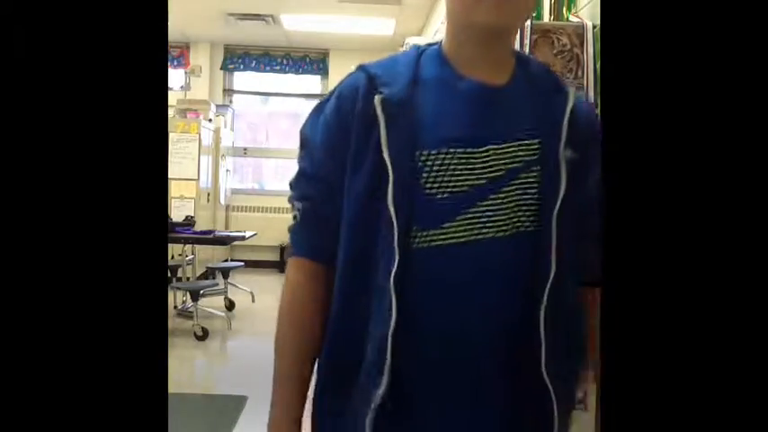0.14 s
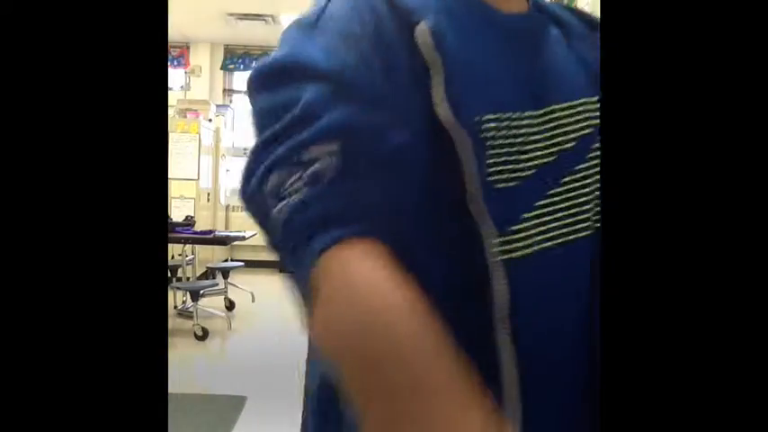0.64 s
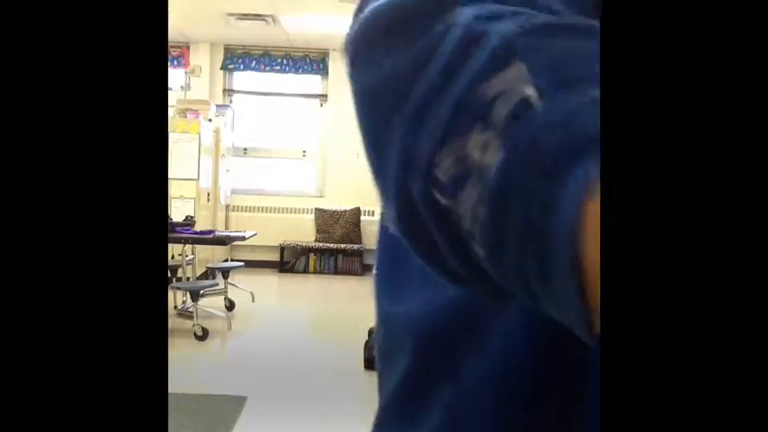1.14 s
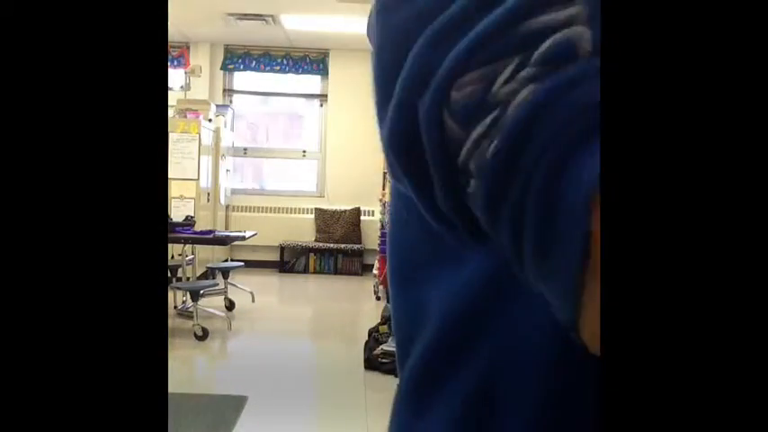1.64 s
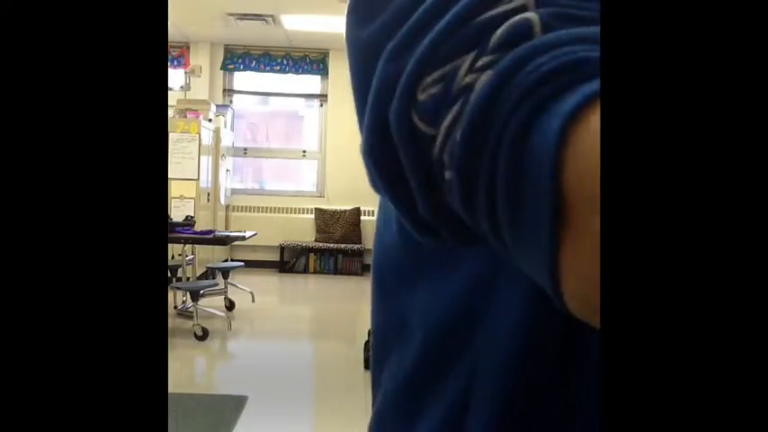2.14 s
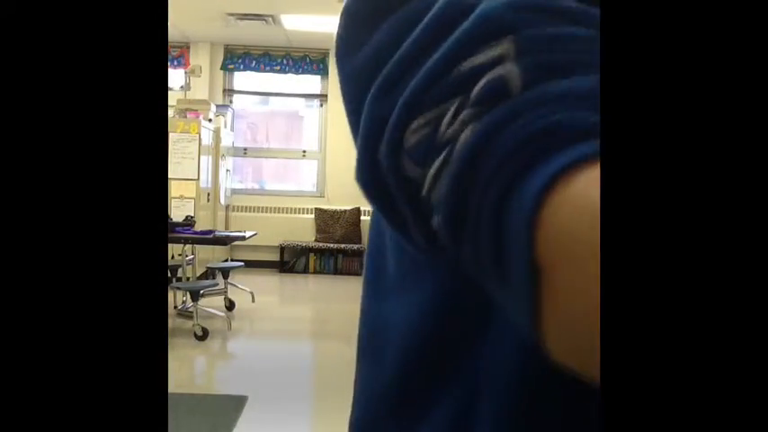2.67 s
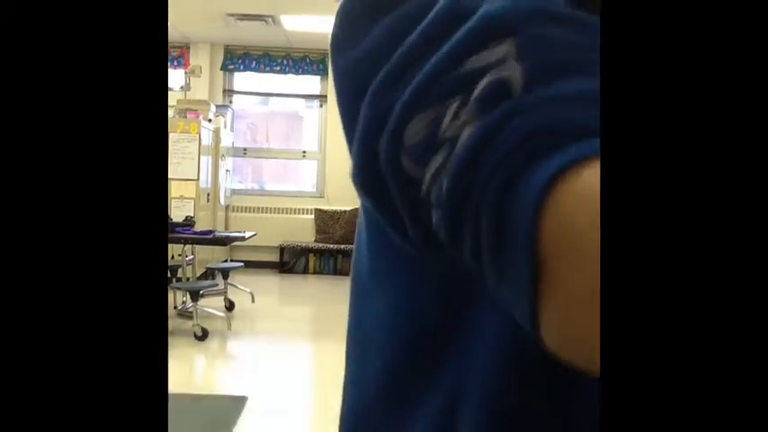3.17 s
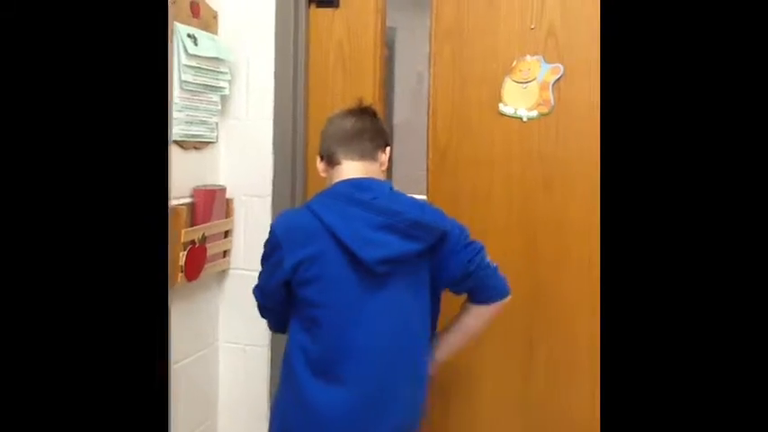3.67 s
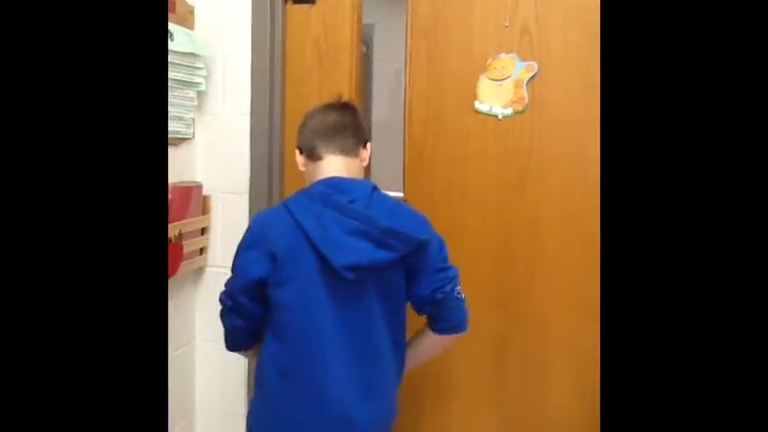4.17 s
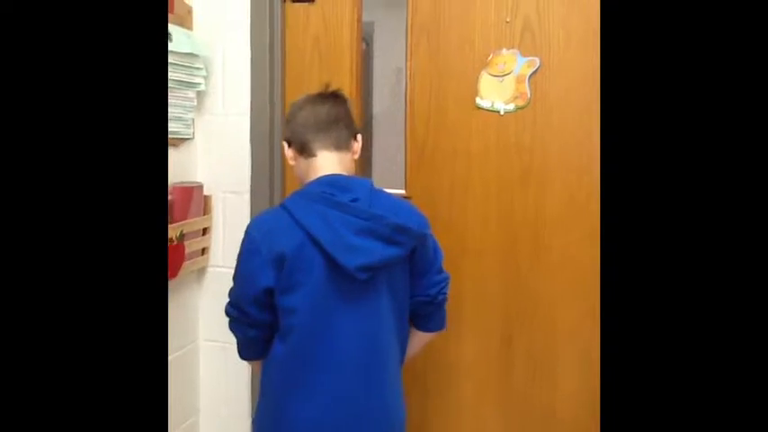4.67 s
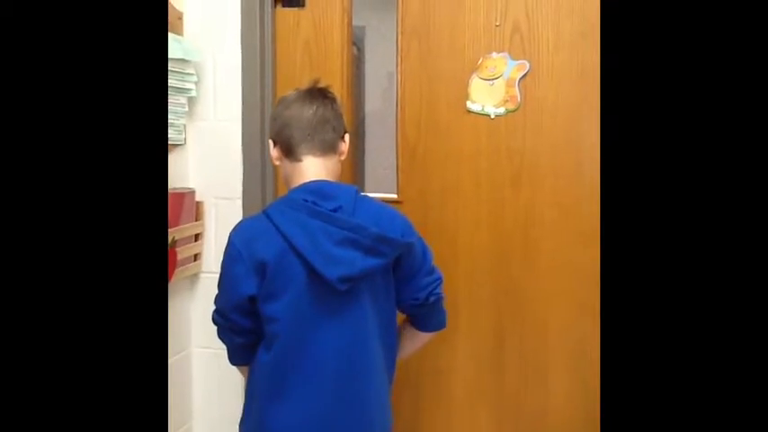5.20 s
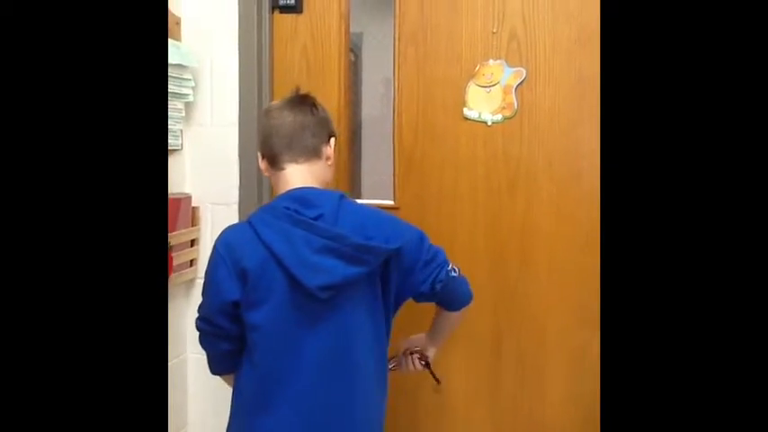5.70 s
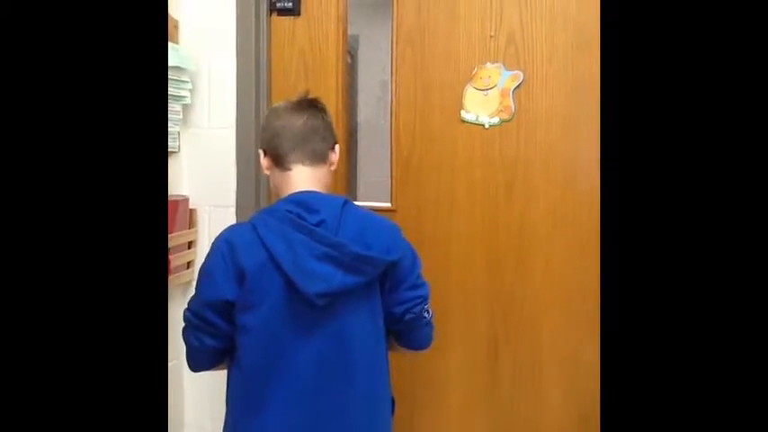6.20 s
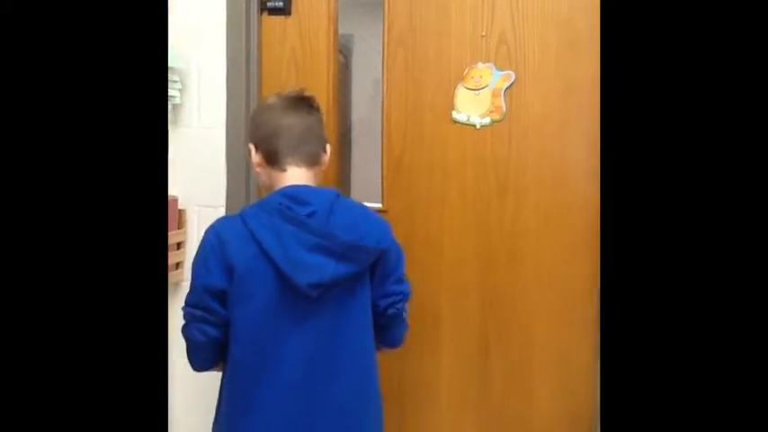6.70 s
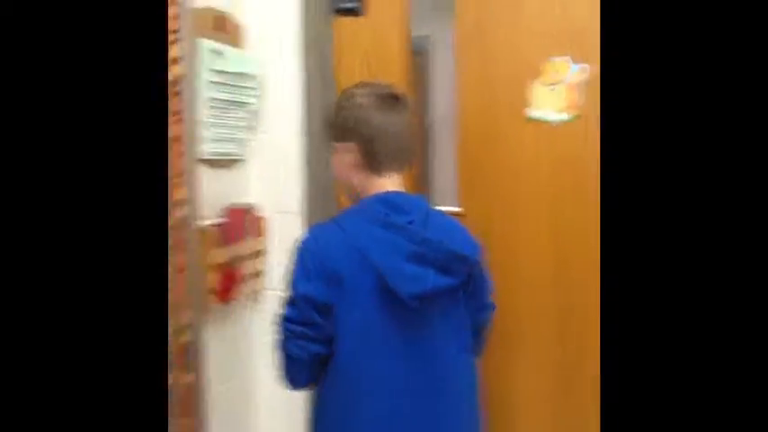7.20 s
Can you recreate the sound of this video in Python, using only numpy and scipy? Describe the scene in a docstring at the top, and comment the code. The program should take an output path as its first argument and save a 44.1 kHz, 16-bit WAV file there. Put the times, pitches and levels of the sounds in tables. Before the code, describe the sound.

Two indoor takes joined by a hard cut. First, irregular woody knocks and handle clatter, very near, growing busy and then sparser, with a soft air rumble behind. Then a fainter, roomier place: tiny high key clinks, fabric and strap rustles, light taps on a door. A tight burst of blows bangs the wooden door, with short room reverberation, then brief latch rattles, shoe shuffles and small jingles.

```python
"""Two places in a school, one after the other. First, close to the microphone, a loose door handle is rattled:
knocks shake the modes of a wooden door and crack in the metal, over ventilation rumble and dull rubbing.
After a cut, farther off, keys touch in bright scratches and ringing modes while cloth and straps rub as gritty
noise. A faint rub rises into a cluster of blows on the door and the room rings on as decaying noise. A loose
latch buzzes, then taps, soft thuds of feet, small rustles and a few more keys follow."""
import sys
import numpy as np
from scipy import signal
from scipy.fft import rfft, irfft
from scipy.io import wavfile

SR = 44100
rng = np.random.default_rng(int(sys.argv[2]) if len(sys.argv) > 2 else 0)


def unload_wav(signal):
    """Save mono or channel-first audio to the path in sys.argv[1] as 16-bit WAV at rate SR, clipped to [-1, 1]."""
    wavfile.write(
        sys.argv[1],
        SR,
        np.round(np.clip(np.atleast_2d(signal).T, -1, 1) * 32767).astype(np.int16),
    )


def invert_db(level):
    """Linear amplitude ratio for a level in decibels (20 dB per decade), elementwise."""
    return 10 ** (np.asarray(level, dtype=float) / 20)


N = 323852


def rms_one(x):
    """Scale to rms 1."""
    return x / np.sqrt(np.mean(x ** 2) + 1e-20)


def at_hz(points, hz):
    """Read a table on a log-frequency axis."""
    hz_points, values = np.transpose(points)
    return np.interp(np.log(hz), np.log(hz_points), values)


def colour(x, spectrum):
    """Causal filter with the shape of the spectrum (minimum phase); white noise keeps its rms."""
    size = 4096
    bin_hz = np.maximum(np.arange(size // 2 + 1) * SR / size, 1)
    gain = invert_db(at_hz(spectrum, bin_hz))
    cepstrum = irfft(np.log(rms_one(gain)))
    # folding the cepstrum forward in time gives minimum phase
    cepstrum[1:size // 2] *= 2
    cepstrum[size // 2 + 1:] = 0
    response = irfft(np.exp(rfft(cepstrum)))
    return signal.fftconvolve(x, response)[:len(x)]


def grit(lumpy_db):
    """Dense tiny contacts: noise whose sizes have a long tail; rms 1."""
    sizes_db = lumpy_db * np.minimum(rng.exponential(1, N), 6)
    return rms_one(rng.standard_normal(N) * invert_db(sizes_db))


def bursts(times, levels_db, lengths_ms, die_ms, rise_ms=.01):
    """Envelope of rattles: quick start, held for its length, then dying; the loudest one counts."""
    out = np.zeros(N)
    t_ms = np.arange(1, int(.15 * SR)) / SR * 1000
    for s, level_db, length_ms, tail_ms in zip(*np.broadcast_arrays(times, levels_db, lengths_ms, die_ms)):
        dying = np.exp(-np.maximum(t_ms - max(length_ms, 0), 0) / max(tail_ms, .2))
        shape = dying * (1 - np.exp(-t_ms / max(rise_ms, .01)))
        i = round(s * SR)
        out[i:i + len(t_ms)] = np.maximum(out[i:i + len(t_ms)], invert_db(level_db) * shape[:N - i])
    return out


def strokes(full_times, holds, levels_db, rise_db_per_s, fall_db_per_s):
    """Level in dB of movements that rise to full, hold and fall at steady rates; the loudest one counts."""
    t = np.arange(N) / SR
    out = np.full(N, -120.)
    for full_s, hold, level_db in zip(full_times, holds, levels_db):
        rise_db = rise_db_per_s * np.maximum(full_s - t, 0)
        fall_db = fall_db_per_s * np.maximum(t - full_s - hold, 0)
        out = np.maximum(out, level_db - rise_db - fall_db)
    return out


def resonances(x, peaks):
    """Parallel two-pole resonators, signs alternating."""
    out = 0
    for k, (hz, width_hz, level_db) in enumerate(peaks):
        r = np.exp(-np.pi * max(width_hz, 5) / SR)
        a = [1, -2 * r * np.cos(2 * np.pi * hz / SR), r * r]
        b = [(1 - r * r) / 2, 0, (r * r - 1) / 2]
        out = out + (-1) ** k * invert_db(level_db) * signal.lfilter(b, a, x + 1e-18)
    return out


def ring(force, hz, t60):
    """A unit click sets a sine starting at height 1 ringing; it decays by 60 dB in t60 seconds."""
    r = invert_db(-60 / (max(t60, .005) * SR))
    w = 2 * np.pi * hz / SR
    return signal.lfilter([0, np.sin(w)], [1, -2 * r * np.cos(w), r * r], force + 1e-18)


# edges of third-octave bands: edge_hz [Hz]
BAND_EDGES = 25 * 2 ** np.arange(0, 9.6, 1 / 3)
# how long the room rings, at both places: pitch_hz [Hz], t60_s [s]
ROOM_DECAY = [(100, .7), (300, 0.66), (1000, 0.4), (4000, 0.43), (12000, 0.37)]


def room(x, build_ms):
    """Diffuse tail: noise that builds up and dies band by band."""
    t = np.arange(SR) / SR
    tail = 0
    white = rng.standard_normal((2, SR))
    for k, (low, high) in enumerate(zip(BAND_EDGES[::2], BAND_EDGES[2::2])):
        sos = signal.butter(2, [low, high], "band", fs=SR, output="sos")
        band = signal.sosfilt(sos, white[k % 2])
        t60 = max(at_hz(ROOM_DECAY, np.sqrt(low * high)), .05)
        tail = tail + band * invert_db(-60 * t / t60)
    tail = tail * (1 - np.exp(-1000 * t / build_ms))
    return signal.fftconvolve(x, tail / np.sqrt(np.sum(tail ** 2)))[:N]


# air at the near place, ventilation rumble: pitch_hz [Hz], level_db [relative dB per Hz]
NEAR_AIR_COLOUR = [(15, -46), (25, -44), (101, 3.5), (240, 6.5), (421, -19.5), (495, -24), (666, -16.5),
                   (1110, -17.5), (1300, -13.5), (1490, -15.5), (3170, -21), (12200, -25), (15500, -27)]
# air at the far place: pitch_hz [Hz], level_db [relative dB per Hz]
FAR_AIR_COLOUR = [(15, -67), (25, -34.5), (43, -15), (96, -12), (169, -2), (567, -14.5), (1140, -18.5),
                  (1530, -18.5), (2560, -20), (3000, -20.5), (3630, -21), (11800, -23), (15500, -24.5)]


def air(spectrum, rms_db):
    """Steady noise with the spectrum of the place, at the given rms in dB."""
    return invert_db(rms_db) * colour(rng.standard_normal(N), spectrum)


# hand and door moving between knocks, pushes:
# full_s [s, when the movement reaches its full level], hold_s [s], level_db [dB]
PUSHES = [(0.67, 0.023, -56), (1.39, 0.018, -40.5), (1.91, 0.014, -50.5), (2.347, 0.086, -44.5),
          (3.204, 0.017, -59)]
# dull rubbing of hand and door: pitch_hz [Hz], level_db [relative dB per Hz]
PUSH_COLOUR = [(71, -28), (120, -5.5), (289, 4), (536, -1), (740, -6.5), (1070, -6.5), (1180, -21),
               (1760, -21), (4000, -33.5), (5200, -82), (8800, -120)]
# a short low hum: pitch_hz [Hz], width_hz [Hz], level_db [dB]
HUM = (224, 9.2, -49.5)
HUM_START_S, HUM_END_S = 3.18, 3.26


def shuffle():
    """Dull gritty rubbing of hand and door, and one short low hum of narrow noise."""
    pushes_db = strokes(*np.transpose(PUSHES), rise_db_per_s=58, fall_db_per_s=22.5)
    pushes_db = np.maximum(pushes_db, -58.5)   # between pushes the rubbing rests at this level
    rubbing = colour(invert_db(pushes_db) * grit(lumpy_db=4.0), PUSH_COLOUR)
    hz, width_hz, level_db = HUM
    progress = np.clip((np.arange(N) / SR - HUM_START_S) / (HUM_END_S - HUM_START_S), 0, 1)
    swell = np.sin(np.pi * progress) ** .5
    hum = rms_one(resonances(rng.standard_normal(N), [(hz, width_hz, 0)]))
    return rubbing + invert_db(level_db) * swell * hum


# feet shifting: full_s [s, when the movement reaches its full level], hold_s [s], level_db [dB]
STEPS = [(6.736, .025, -54), (6.942, .01, -47.5), (7.218, .06, -75), (7.316, .004, -70)]
# soft thud of a shoe: pitch_hz [Hz], level_db [relative dB per Hz]
STEP_COLOUR = [(35, -61), (60, -34), (172, -2.5), (355, -7), (389, -7), (494, -14.5), (900, -17),
               (1170, -40.5), (1980, -120)]


def feet():
    """Shoes thud softly on the floor: low noise that rises and falls with each step."""
    level_db = strokes(*np.transpose(STEPS), rise_db_per_s=204, fall_db_per_s=184)
    return invert_db(level_db) * colour(rng.standard_normal(N), STEP_COLOUR)


# cloth and strap strokes: full_s [s, when the movement reaches its full level], hold_s [s],
# level_db [dB], pitch_hz [Hz, centre of the rub]
RUBS = [(4.093, .004, -49.5, 11400), (4.224, .004, -53.5, 11300), (4.326, 0.045, -55, 10500),
        (4.43, 0.027, -59, 10000), (4.505, .03, -59.5, 3580), (4.682, .01, -56.5, 10000),
        (4.796, .004, -53, 11600), (4.91, .03, -61.5, 11500), (4.972, 0.0037, -48.5, 10200),
        (5.494, 0.09, -57, 8900), (5.647, .004, -59, 10200), (5.842, 0.023, -56, 6540),
        (5.894, 0.015, -46.5, 5400), (5.924, 0.021, -44, 4380), (5.943, 0.027, -49, 2500),
        (6.141, 0.047, -47.5, 11600), (6.686, 0.0072, -61, 10070), (6.718, 0.015, -47, 3500),
        (6.73, 0.023, -46.5, 9400), (6.763, 0.028, -46.5, 8300), (6.913, 0.035, -52, 3000),
        (7.012, 0.032, -54, 8900), (7.055, 0.026, -59, 10000), (7.15, .04, -64.5, 7300)]
# door panel scraped or touched: pitch_hz [Hz], level_db [relative dB per Hz]
SCRAPE_COLOUR = [(180, -43), (300, -6), (439, -11.5), (615, -4.5), (817, -4.5), (1100, -6), (1300, -1.5),
                 (1820, -4), (2040, -12), (2500, -9.5), (3250, -42.5), (5500, -120)]
# slow, pressed strokes are dull and reach the panel
PRESSED_HZ, PANEL_DB, PANEL_LOSS_DB_PER_OCTAVE = 3000, 2, 13.5


def cloth(octaves=0.66, skirt_db=-14):
    """Gritty rubbing; a broad spectral hump glides between the strokes' pitches, and the panel hums along."""
    full_s, hold, level_db, hz = np.transpose(RUBS)
    rub_db = strokes(full_s, hold, level_db, rise_db_per_s=399.5, fall_db_per_s=299.5)
    pressed_db = level_db + PANEL_DB - PANEL_LOSS_DB_PER_OCTAVE * np.log2(hz / PRESSED_HZ)
    panel_db = strokes(full_s, hold, pressed_db, rise_db_per_s=800, fall_db_per_s=197)
    centre_hz = np.interp(np.arange(N) / SR, np.ravel([full_s, full_s + hold], "F"), np.repeat(hz, 2))
    rub = [grit(lumpy_db=1.5), grit(lumpy_db=1.5)]
    panel = colour(grit(lumpy_db=4.5), SCRAPE_COLOUR)
    stroke, power = 0, 0
    for k, (low, high) in enumerate(zip(BAND_EDGES[16::2], BAND_EDGES[18::2])):
        sos = signal.butter(2, [low, high], "band", fs=SR, output="sos")
        band = signal.sosfilt(sos, rub[k % 2])
        distance = np.log2(np.sqrt(low * high) / centre_hz) / octaves
        gain = invert_db(skirt_db) + np.exp(-.5 * distance ** 2)
        stroke = stroke + gain * band
        power = power + gain ** 2 * np.var(band)
    return invert_db(rub_db) * stroke / np.sqrt(power) + invert_db(panel_db) * panel


# soft taps on the door, and a faint rub rising into the bang (6.244, 6.254):
# start_s [s], level_db [dB before the resonance], pitch_hz [Hz where the spot rings]
TOUCHES = [(4.317, -62, 900), (4.513, -57, 800), (4.559, -61.5, 900), (4.589, -66, 800), (4.903, -65, 600),
           (4.952, -59.5, 570), (4.987, -63, 1500), (6.244, -48, 700), (6.254, -42, 900),
           (6.693, -49.5, 803), (6.726, -41.5, 1590), (6.908, -45.5, 1250), (6.939, -69, 906)]
TOUCH_MS, TOUCH_DIE_MS = 12, 9.0
SPOT_WIDTH_HZ, SPOT_DB = 240, 15.5


def taps_and_rub():
    """Soft taps and a faint rub on the door: short gritty touches, each ringing the spot it lands on."""
    s, level_db, _ = np.transpose(TOUCHES)
    touch = grit(lumpy_db=4.0)
    out = colour(bursts(s, level_db, TOUCH_MS, TOUCH_DIE_MS) * touch, SCRAPE_COLOUR)
    for time_s, touch_db, hz in TOUCHES:
        force = bursts([time_s], touch_db, TOUCH_MS, TOUCH_DIE_MS) * touch
        out += resonances(force, [(hz, SPOT_WIDTH_HZ, SPOT_DB)])
    return out


# loose latch after the bang: start_s [s], level_db [dB before the resonances]
LATCH_RATTLES = [(6.4694, -38), (6.529, -28.5), (6.569, -38), (6.6234, -37.5), (6.6444, -48)]
# modes of the latch: pitch_hz [Hz], width_hz [Hz], level_db [dB]
LATCH_PEAKS = [(1285, 124, 5.5), (1660, 100, -2), (2106, 300, -8)]


def latch():
    """A loose metal part buzzes in short rattles: lumpy contacts drive its modes."""
    s, level_db = np.transpose(LATCH_RATTLES)
    force = bursts(s, level_db, lengths_ms=8, die_ms=13.2) * grit(lumpy_db=5.0)
    return resonances(force, LATCH_PEAKS)


# keys touching: start_s [s], level_db [dB before the layer gains], pitch_hz [Hz near which it rings most]
KEY_TOUCHES = [(3.392, -42.5, 11300), (3.7494, -43.5, 11300), (3.8815, -47, 7200), (4.0467, -50, 10900),
               (4.069, -38.5, 11800), (4.0894, -45, 12500), (4.1936, -44, 12800), (4.2183, -36, 14500),
               (4.3, -42.5, 9100), (4.318, -39, 12400), (4.3397, -37.5, 11600), (4.4278, -45, 7700),
               (4.4468, -37.5, 11200), (4.4694, -43.5, 11700), (4.5915, -43, 9890), (4.6613, -44, 7540),
               (4.6794, -44.5, 11500), (4.78, -44.5, 12700), (4.7953, -35, 12400), (4.8294, -45, 14600),
               (4.8968, -41.5, 12600), (4.9462, -35, 11900), (4.9755, -28.5, 11100), (4.989, -28, 6840),
               (5.2914, -49, 10100), (5.3602, -36, 7650), (5.4966, -33, 10600), (5.5443, -37, 13100),
               (5.564, -35.5, 14000), (5.5902, -35.5, 10800), (5.6083, -35.5, 11000),
               (5.6446, -39.5, 11900), (5.7922, -47, 9900), (6.1027, -42, 15100), (6.129, -35, 11600),
               (6.148, -34, 10900), (6.1897, -38.5, 12400), (6.6518, -41.5, 12200), (6.6837, -37, 12500),
               (6.7713, -26.5, 11400), (6.7914, -26.5, 12000), (6.9383, -39.5, 11900),
               (7.0094, -38.5, 7450), (7.197, -46, 11600), (7.2274, -46, 11400)]
# many close, short modes: count, lowest_hz [Hz before a random shift], highest_hz [Hz, likewise], t60_s [s]
KEY_MODES = (40, 3800, 15300, .022)
# scratch of a touch: pitch_hz [Hz], level_db [relative dB per Hz]
SCRATCH_COLOUR = [(290, -41.5), (500, -8.5), (927, -14.5), (1580, -9.5), (2100, -8), (6640, -4.5),
                  (9370, -5.5), (11500, 2), (15500, -3.5)]
# one key swinging free rings on: start_s [s], level_db [dB], t60_s [s]
FREE_RINGS = [(5.012, -48, .2), (5.225, -58, .06), (7.05, -59, .1), (7.08, -53, .07), (7.135, -56, .07),
              (7.23, -57, .06)]
FREE_RING_HZ = 11650
CLINK_MS = 4.5
GLINT_DB = -36   # ringing drive relative to the level of a touch


def keys(reach_octaves=.028, stray_db=-10):
    """Each touch is a bright scratch; it rings the key modes near its pitch, and the others weakly at random."""
    s, level_db, ring_hz = np.transpose(KEY_TOUCHES)
    count, low_hz, high_hz, t60 = KEY_MODES
    scratch = grit(lumpy_db=3.0)
    scratch[np.round(s * SR).astype(int)] = 8.1   # each touch opens with a sharp tick
    out = invert_db(-11.5) * colour(bursts(s, level_db, CLINK_MS, die_ms=9.0) * scratch, SCRATCH_COLOUR)
    strays = invert_db(stray_db + rng.normal(0, 5, (len(s), count)))
    glint_db = level_db + GLINT_DB
    modes_hz = np.linspace(low_hz, high_hz, count) + rng.uniform(-100, 100, count)
    for k, hz in enumerate(modes_hz):
        near = np.exp(-.5 * (np.log2(hz / ring_hz) / reach_octaves) ** 2)
        share = strays[:, k] * (hz / high_hz) ** 2 + near
        mode_db = glint_db + 20 * np.log10(share)
        out += ring(bursts(s, mode_db, CLINK_MS, die_ms=19.0) * scratch, hz, t60)
    for time_s, ring_db, t60 in FREE_RINGS:   # a hand damps most of them early
        click = np.arange(N) == round(time_s * SR)
        out += ring(invert_db(ring_db) * click, FREE_RING_HZ, t60)
    return out


# handle knocks: start_s [s], level_db [dB before the layer gains],
# hardness_db [dB, metal crack over panel, before the layer gains], length_ms [ms of rattle]
HANDLE_KNOCKS = [(0.122, -46, -28, 15), (0.279, -38, -15.5, 0.74), (0.39, -58.5, 12, 3.5),
                 (0.511, -56, -2, 36), (0.873, -35, -34, 11), (0.916, -39, -10, 0.91),
                 (1.098, -32, -26, 5.6), (1.149, -34.5, -19, 4.2), (1.225, -32, -7, 9.8),
                 (1.321, -22, -13, 13), (1.336, -24, -7.5, 6.6), (1.353, -21, -17, 4.1),
                 (1.397, -33, -4.5, 5.4), (1.494, -34.5, -8, 7.2), (1.519, -29, -26, 5.2),
                 (1.598, -42, -14, 6.8), (1.643, -28.5, -14, 7.9), (1.654, -29, -12, 12),
                 (1.687, -27.5, -15.5, 10.4), (1.838, -24, -27, 17), (1.858, -27, -11, 2.6),
                 (1.948, -35.5, -11.5, 8.5), (2.125, -36.5, -17.5, 17), (2.178, -38, -12.5, 3.9),
                 (2.23, -42, -23, 6), (2.256, -36, -11.5, 7.6), (2.278, -18.5, -11, 9.5),
                 (2.336, -25, -7.5, 4), (2.455, -28, -37, 5.9), (2.595, -26.5, -28, 9),
                 (2.742, -24, -40, 3.2), (2.819, -44.5, -8, 11), (2.877, -38.5, -24.5, 5),
                 (2.918, -43, -6, 5.7), (2.941, -28, -4, 9.8), (2.96, -24, -11, 2.9),
                 (3.01, -31.5, -7.5, 5.2)]
# modes of door and handle: pitch_hz [Hz], width_hz [Hz], level_db [dB before random strengths and gains]
DOOR_MODES = [(267, 106, -12.5), (380, 50, -1.5), (442, 25, -4.5), (509, 40, 5), (626, 154, -2),
              (750.3, 130, -2), (924, 63, -0.5), (967, 58, -0.5), (1170, 130, 0), (1279, 115, 2),
              (1334, 284, -5), (1574, 130, -5), (1720, 430, -14.5), (2650, 84, -16.5), (2936, 240, -21)]
# metal crack: pitch_hz [Hz], level_db [relative dB per Hz]
CRACK_COLOUR = [(880, -31), (1500, -7), (2070, -6.5), (3210, -7), (3540, -9), (4020, -8), (10500, -19.5),
                (15500, -26)]
# knocks above a level bounce once, duller
REBOUND_ABOVE_DB, REBOUND_S, REBOUND_MS = -33, .017, 7.5
REBOUND_DB, REBOUND_SOFTER_DB, REBOUND_UPPER_DB = -2, -32, -4
# harder knocks reach the upper panel modes
UPPER_FROM_HZ, UPPER_DB, UPPER_PER_HARDNESS, UPPER_LEAST_DB = 750, 5.0, 0.38, -5
# the handle's own rings; longer rattles die more slowly
METAL_FROM_HZ, METAL_DB, DIE_MS, DIE_PER_LENGTH = 2000, 14.5, 6.6, 0.83
PANEL_TOP_HZ = 3000


def handle(first_blow=15.5):
    """Rattles shake the panel, each mode with its own strength per knock; the metal parts add a crack."""
    s, low_db, hardness_db, length_ms = np.transpose(HANDLE_KNOCKS)
    # append the rebounds to the knocks
    duller_db = np.repeat([0, REBOUND_UPPER_DB], len(s))
    length_ms = np.r_[length_ms, np.full(len(s), REBOUND_MS)]
    rebound_db = np.where(low_db > REBOUND_ABOVE_DB, low_db + REBOUND_DB, -120)
    s, low_db = np.r_[s, s + REBOUND_S], np.r_[low_db, rebound_db]
    hardness_db = np.r_[hardness_db, hardness_db + REBOUND_SOFTER_DB]

    reach_db = np.maximum(UPPER_DB + UPPER_PER_HARDNESS * hardness_db, UPPER_LEAST_DB)
    upper_db = low_db + reach_db + duller_db
    crack_db = low_db + hardness_db
    metal_db = crack_db + METAL_DB
    die_ms = DIE_MS + DIE_PER_LENGTH * length_ms
    strengths_db = rng.normal(0, 2.15, (len(s), len(DOOR_MODES)))
    shaking = grit(lumpy_db=4.0)
    shaking[np.round(s * SR).astype(int)] = first_blow   # every rattle opens with one firm contact
    panel = 0
    for k, mode in enumerate(DOOR_MODES):
        if mode[0] < UPPER_FROM_HZ:
            level_db = low_db
        elif mode[0] < METAL_FROM_HZ:
            level_db = upper_db
        else:
            level_db = metal_db
        force = bursts(s, level_db + strengths_db[:, k], length_ms, die_ms) * shaking
        panel = panel + (-1) ** k * resonances(force, [mode])
    # wood swallows the treble
    panel = signal.sosfilt(signal.butter(2, PANEL_TOP_HZ, fs=SR, output="sos"), panel)
    crack = bursts(s, crack_db, length_ms, die_ms=16.8, rise_ms=1.65) * grit(lumpy_db=0.5)
    return invert_db(7.5) * panel + invert_db(-8.5) * colour(crack, CRACK_COLOUR)


# the bang, a cluster of blows: start_s [s], level_db [dB before the layer gains]
BLOWS = [(6.264, -9), (6.27, -6.5), (6.276, -4.5), (6.282, -1.5), (6.293, -4.5), (6.301, -6.5), (6.313, -5),
         (6.32, -6), (6.328, -10), (6.343, -12), (6.352, -13), (6.367, -18.5), (6.394, -26), (6.424, -30.5)]
# broad clatter: pitch_hz [Hz], level_db [relative dB per Hz]
CLATTER_COLOUR = [(35, -61.5), (60, -44.5), (292, 2.5), (424, -6), (628, -1), (810, -6.5), (897, 4),
                  (994, -7), (1100, 3), (1240, -10.5), (1440, -5), (1900, -7), (3500, -16.5), (4550, -42),
                  (7700, -120)]
# spray of treble: pitch_hz [Hz], level_db [relative dB per Hz]
TREBLE_COLOUR = [(1470, -23), (2500, -1.5), (4230, -7), (4600, -6.5), (5490, -10.5), (9010, -13),
                 (15500, -22)]
# low modes of the door slab: pitch_hz [Hz], width_hz [Hz], level_db [dB before the layer gain]
SLAB_MODES = [(108, 14, -23.5), (203, 61, -4), (265, 32, 3.5), (315, 22, -2.5), (367, 39, 2.5),
              (495, 40, -14), (616, 32, -6), (665, 99, -1.5), (924, 110, -5), (1067, 53, -6),
              (1404, 120, -4)]
BLOW_MS, FIRM_AFTER_S, FIRST_BLOW_DULL_DB = 7.1, .0015, -3
SLAB_SWELL_DB_PER_S = 29.5   # later blows find the slab already moving


def bang(order=4, firm_blow=16.3):
    """A heavy bunch of blows on the door: a broad clatter, the slab's low modes and a spray of treble."""
    s, level_db = np.transpose(BLOWS)
    contact = grit(lumpy_db=4.0)
    contact[np.round((s + FIRM_AFTER_S) * SR).astype(int)] = -firm_blow   # one hard contact in each blow
    clatter = colour(bursts(s, level_db, BLOW_MS, die_ms=6.9, rise_ms=1.1) * contact, CLATTER_COLOUR)
    slab_db = level_db + SLAB_SWELL_DB_PER_S * (s - s[0])
    slab = resonances(bursts(s, slab_db, BLOW_MS, die_ms=13.0) * grit(lumpy_db=4.5), SLAB_MODES)
    # a slab radiates deep bass poorly
    slab = signal.sosfilt(signal.butter(order, 85, "high", fs=SR, output="sos"), slab)
    treble_db = level_db + FIRST_BLOW_DULL_DB * (s == s[0])
    spray = bursts(s, treble_db, BLOW_MS, die_ms=19.0, rise_ms=2.9) * grit(lumpy_db=2.5)
    return invert_db(-13) * clatter + invert_db(2.5) * slab + invert_db(-14) * colour(spray, TREBLE_COLOUR)


CUT_S, RESUME_S, FADE_IN_S, GAP_DB = 3.268, 3.29, 0.029, -36


def scene():
    """The near place stops dead; after a short gap the far place fades in."""
    t = np.arange(N) / SR
    door = handle()
    near = door + invert_db(-9.5) * room(door, build_ms=7.6) + shuffle()
    near = near + air(NEAR_AIR_COLOUR, rms_db=-54)

    jingle, blow = keys(), bang()
    hands_and_feet = cloth() + latch() + taps_and_rub() + feet()
    into_room = invert_db(-10.5) * jingle + invert_db(-7.0) * hands_and_feet + invert_db(-11) * blow
    far = jingle + hands_and_feet + blow + room(into_room, build_ms=3.6)
    far = far + air(FAR_AIR_COLOUR, rms_db=-60)
    fade = np.clip((t - RESUME_S) / FADE_IN_S, invert_db(GAP_DB), 1)
    return np.where(t < CUT_S, near, far * fade)[None]


def top_cut(x):
    """Nothing passes above the cut-off."""
    return signal.sosfilt(signal.butter(12, 15780, fs=SR, output="sos"), x)


MIC_LOW_HZ, TOP_HZ = 50, 15380


def record(dry):
    """The microphone rounds loud peaks and loses the deep bass; the top is cut steeply."""
    x = 1.2 * np.tanh(dry / 1.2)
    x = signal.sosfilt(signal.butter(2, MIC_LOW_HZ, "high", fs=SR, output="sos"), x)
    x = signal.sosfilt(signal.ellip(10, .5, 70, TOP_HZ, fs=SR, output="sos"), x)
    return top_cut(x)


dry = scene()
out = record(dry)
unload_wav(out)
```